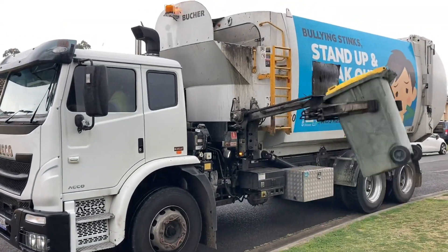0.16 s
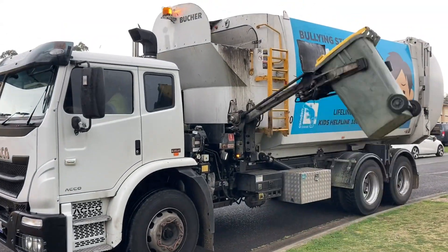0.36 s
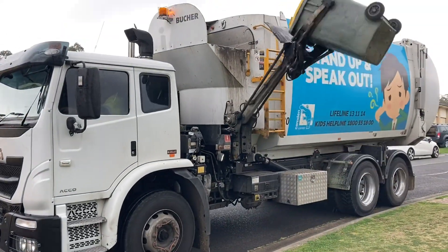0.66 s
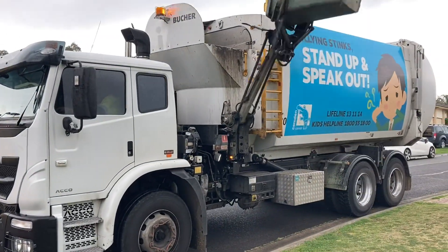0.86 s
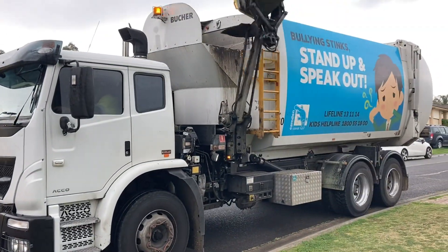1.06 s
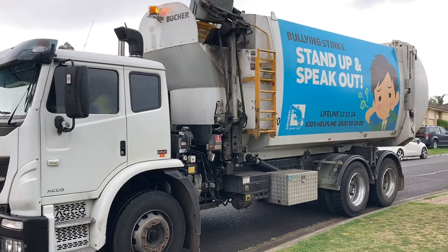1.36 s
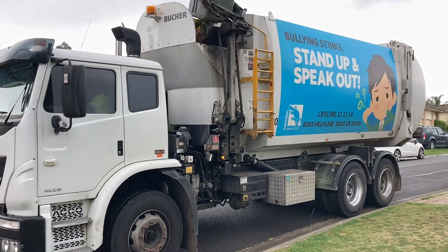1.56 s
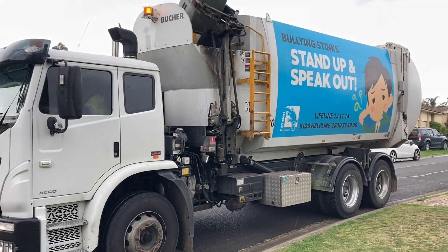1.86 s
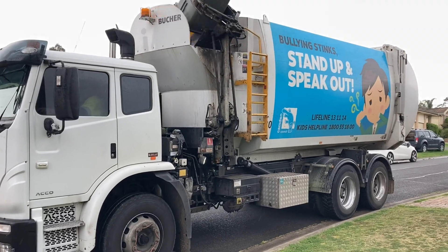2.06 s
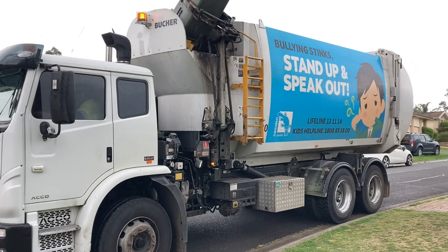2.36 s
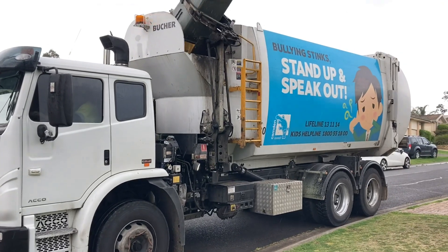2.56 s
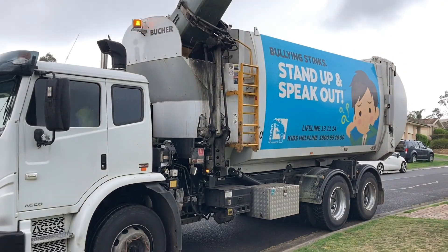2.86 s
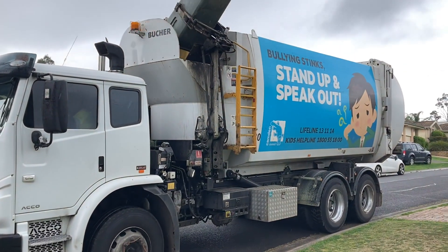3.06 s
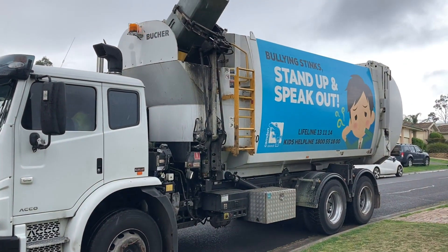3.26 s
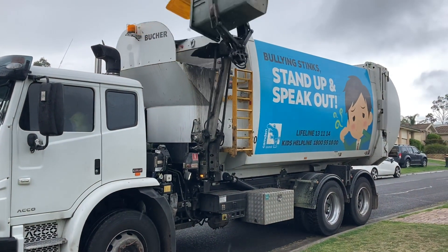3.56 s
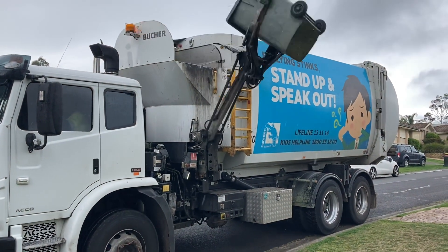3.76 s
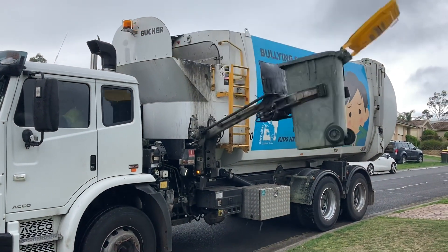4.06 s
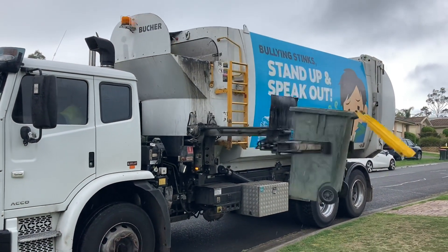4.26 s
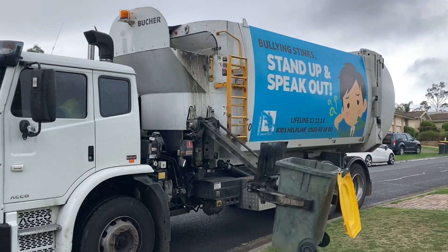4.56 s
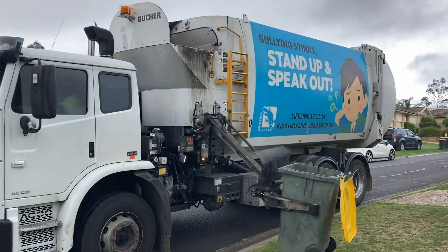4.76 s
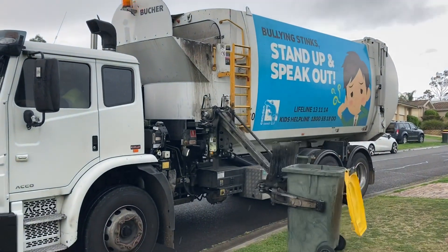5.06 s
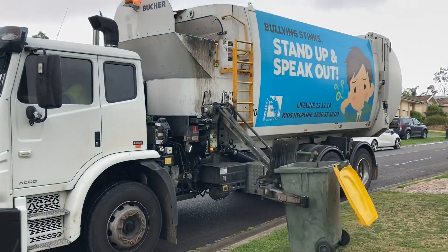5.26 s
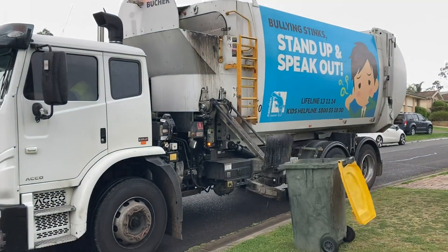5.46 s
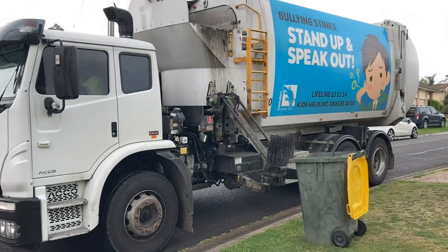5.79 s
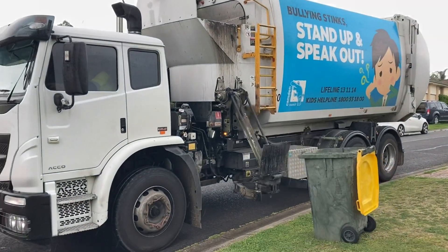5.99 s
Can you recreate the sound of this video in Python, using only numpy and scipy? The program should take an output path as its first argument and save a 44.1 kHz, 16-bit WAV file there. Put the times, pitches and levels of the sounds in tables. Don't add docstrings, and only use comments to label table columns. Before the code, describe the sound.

A handheld stereo phone hears a garbage truck close by on a suburban verge. Throbbing diesel knock and pump whine run throughout. Dull bumps lead to a dense, bright spill of rubbish with two huge metallic bangs and clinking glass and cans, fading in scattered clanks. Hydraulics hum more clearly while the arm descends, the bin bumps down, then air hisses with a small clack.

```python
import sys
import numpy as np
from scipy import signal
from scipy.fft import rfft, irfft, next_fast_len
from scipy.io import wavfile
from scipy.ndimage import uniform_filter1d

SR = 44100
rng = np.random.default_rng(int(sys.argv[2]) if len(sys.argv) > 2 else 0)


def undo_db(level):
    steps = np.asarray(level, float) / 20
    return 10 ** steps


def generate_wav(signal):
    frames = np.transpose(np.atleast_2d(signal))
    scaled = np.clip(frames, -1, 1) * 32767
    pcm = np.round(scaled).astype(np.int16)
    wavfile.write(sys.argv[1], SR, pcm)


N = 270333
M = 2 * next_fast_len(N // 2 + 1)
T, F = np.arange(N) / SR, np.arange(M // 2 + 1) * SR / M
PUMP_RATIO = 3.42


def curves(table):
    s, *columns = np.transpose(table)
    return [np.interp(T, s, c) for c in columns]


def unit(x):
    return x / np.sqrt(np.mean(x ** 2))


def colour(x, points, peaks=()):
    hz, db = np.transpose(points)
    gain_db = np.interp(np.log(F + 1), np.log(hz), db, left=-80, right=-80)
    for peak_hz, width_hz, peak_db in peaks:
        gain_db = gain_db + peak_db / (1 + (2 * (F - peak_hz) / width_hz) ** 2)
    return unit(irfft(rfft(x, M) * undo_db(gain_db), M)[..., :N])


def band(x, lo_hz, hi_hz):
    sos = signal.butter(2, [lo_hz, min(hi_hz, .45 * SR)], "band", fs=SR, output="sos")
    return unit(signal.sosfilt(sos, x))


def walk(rate):
    k = int(SR / rate)
    held = np.repeat(rng.standard_normal(N // k + 1), k)[:N]
    return unit(uniform_filter1d(uniform_filter1d(held, k), k))


def ring(x, hz, t60):
    r, w = np.exp(-np.log(1000) / (t60 * SR)), 2 * np.pi * hz / SR
    return signal.lfilter([np.sin(w)], [1, -2 * r * np.cos(w), r * r], x)


def tone(turns, db, wobble_db=1.5):
    level = np.sqrt(2) * undo_db(db + wobble_db * walk(6))
    return level * np.sin(2 * np.pi * (turns + rng.random()))


def noise(size=N):
    return rng.standard_normal((3, size))


def grains(size, rate, spread_db):
    size_db = spread_db * np.minimum(rng.exponential(size=size), 3)
    struck = rng.random(size) < rate / SR
    return unit(struck * undo_db(size_db) * noise(size))


def add(out, s, db, sound):
    i = int(s * SR)
    out[:, i:i + sound.shape[-1]] += undo_db(db) * (sound / np.abs(sound).max())[..., :N - i]


def engine():
    # t/s, firing rate f/Hz
    speed = [(0, 44.9), (.6, 46.15), (1, 46.5), (1.4, 47.15), (2.1, 47.2), (2.5, 46.7), (3.45, 45.95),
             (3.6, 47.5), (4.3, 47.1), (5.8, 47.2), (6.13, 46.85)]
    # t/s, level/dB, bass duck/dB
    engine_level = [(0, -31.5, 1.2), (.4, -28, 0), (.8, -28, -1.5), (1.0, -28, 0.1), (1.4, -29, 0.1),
                    (1.55, -30, -4), (1.74, -30, -4), (1.88, -39, -10.5), (2.2, -38, -7), (2.6, -39, -.2),
                    (3.1, -39, 2.2), (3.2, -36, .1), (3.45, -36.5, -3), (3.8, -38, 2.2), (4.6, -37, 3),
                    (5.0, -38, 1.2), (5.6, -35.5, 1.2), (6.13, -34.5, .1)]
    (hz,), (clatter_db, bass_duck_db) = curves(speed), curves(engine_level)
    turns = np.cumsum(hz) / SR
    first_db = clatter_db + 1.5 + 1.05 * bass_duck_db
    third_db = clatter_db + 5.0 + 0.95 * bass_duck_db
    rumble_db = clatter_db + 2.5 + 0.3 * bass_duck_db
    out = exhaust(turns, first_db, third_db)
    out = out + casing(turns, first_db, rumble_db, clatter_db)
    return out + hydraulics(turns, clatter_db, bass_duck_db) + arm_drones(turns, clatter_db)


def exhaust(turns, first_db, third_db):
    # multiple of firing rate, level over the third/dB
    orders = [(2, -17), (4, -13), (5, -15), (6, -9)]
    out = tone(1.01 * turns, first_db, 0.41) + tone(3 * turns, third_db)
    return out + sum(tone(k * turns, third_db + db, 2.0) for k, db in orders)


def casing(turns, first_db, rumble_db, clatter_db):
    cylinders = [0, -6, -12, -1, -7, -11]
    # f/Hz, level/dB
    shudder = [(25, -30), (40, -10), (75, 6), (115, -4), (140, 3), (200, -36)]
    # f/Hz, level/dB
    roar = [(90, -15), (150, -1), (220, -3), (300, -2), (360, -4), (420, -12), (480, -8), (540, -17),
            (800, -62)]
    # f/Hz, level/dB
    rattle = [(400, -25), (650, -5.5), (800, -8.5), (1300, -7), (1750, -9), (3000, -8.5), (5200, -15),
              (6800, -13), (9000, -14), (12000, -18), (15600, -24), (16200, -50)]
    # f/Hz, width/Hz, level/dB
    block = [(660, 27, 4), (1060, 250, 10), (1296, 33, 1.5), (1844, 17, -0.5), (2154, 116, 7),
             (2530, 34, 4.5), (3450, 320, 2.5), (4000, 130, 2.5), (4230, 120, 5), (6670, 100, 1.5)]
    firing = turns.astype(int)
    knock_db = np.array(cylinders)[firing % 6] + .8 * rng.standard_normal(400)[firing]
    throb = uniform_filter1d(undo_db(knock_db) * np.exp(-(turns % 1) / 1.3), 200)
    sub = colour(undo_db(1.9 * walk(4.94)) * noise(), shudder)
    rumble = colour((4.3 + throb) * undo_db(1.1 * walk(9)) * noise(), roar)
    clatter = colour((.95 + throb) * undo_db(.7 * walk(11)) * noise(), rattle, block)
    ticks = throb ** 2 * noise()
    clatter += undo_db(-17.5) * unit(ring(ticks, 3930, 0.047))
    clatter += undo_db(-22.0) * unit(ring(ticks, 2162, 0.099))
    return undo_db(first_db - 4.0) * sub + undo_db(rumble_db - 1.0) * rumble + undo_db(clatter_db + 3.5) * clatter


def hydraulics(turns, heard_db, bass_duck_db):
    # t/s, pulse level over the engine/dB
    pump = [(0, -17), (.8, .5), (1.7, -1.2), (1.9, -15), (2.1, -3), (2.3, 4), (2.6, 4), (3.0, -5),
            (3.2, -6), (3.5, 4), (3.8, .5), (4.2, 6.5), (5.0, 5), (5.4, 1.2), (6.13, 4.5)]
    pressure_db, = curves(pump)
    octave_db = heard_db - 8.0 - 0.8 * np.clip(pressure_db, -6.0, None) + bass_duck_db
    gear = 23.5 * turns + np.cumsum(9.0 * walk(12)) / SR
    pulses = tone(PUMP_RATIO * turns, heard_db + pressure_db)
    return pulses + tone(2 * PUMP_RATIO * turns, octave_db, 4.1) + tone(gear, heard_db - 6.5, 2.6)


def arm_drones(turns, heard_db):
    lowers_s, lowering_s = 3.5, 2.2
    lowered = np.clip((T - lowers_s) / lowering_s, 0, 1)
    lift = np.clip(1 - 10 * lowered, 0, 1) * tone(3 * PUMP_RATIO * turns, heard_db - 17.0, 2.1)
    fourth = tone(4 * PUMP_RATIO * turns, heard_db - 26.0 + 12.0 * lowered, 2.5)
    timing = tone(46 * turns, heard_db - 19.5, 3.0)
    return lift + fourth + timing


def thumps():
    # t/s, peak level/dB, f/Hz, ring t60/s
    dull_blows = [(.3, -22, 75, 0.13), (0.381, -12.5, 201, 0.18), (.67, -12, 55, .2), (1.02, -22, 90, .15),
                  (1.419, -15, 85, .2), (1.699, -14, 162, 0.12), (3.38, -24, 80, .35),
                  (3.52, -19, 74.8, .2), (3.55, -14, 150, 0.073), (4.464, -12, 130, 0.2),
                  (4.521, -18, 88.9, 0.18), (5.08, -19, 110, .08), (5.16, -14, 180, .08),
                  (5.18, -11, 98, .12), (5.2, -21, 300, .15), (5.215, -13, 95, .12)]
    out, t = np.zeros((3, N)), T[:SR // 6]
    for s, db, hz, t60 in dull_blows:
        push = np.sin(np.pi * np.clip(t * hz * 2.07, 0, 1))
        panel = ring(push, hz, t60) + 0.91 * ring(push, 1.3 * hz, 0.52 * t60)
        add(out, s, db, np.cos(3 * np.pi * t) * panel)
    return out


def hits():
    # t/s, peak level/dB, f/Hz, body level/dB, top level/dB
    sharp_blows = [(0.967, -16, 1100, -8, -15), (1.276, -22, 1130, -16, -14), (1.35, -11, 3840, -14, -22),
                   (1.652, -17, 1600, -17, -14), (1.7, 2.5, 1125, 2, -7), (1.782, 2.5, 1030, -7, -19),
                   (1.82, -2, 1156, 0, -12), (1.885, -6, 1050, -11, -16), (1.963, -19, 1290, -21, -24),
                   (1.994, -8.5, 2710, -17, -4), (2.028, -9.5, 1310, -1, -8), (2.079, -15, 1006, -22, -22),
                   (2.127, -14, 1070, -4, -12), (2.211, -17, 1300, -3, -25), (2.239, -14, 1028, -6, -14),
                   (2.298, -13, 1250, -8, -14), (2.359, -11, 1000, 1, -25), (2.402, -16, 1060, -13, -11),
                   (2.42, -9.5, 1100, -8, -16), (2.82, -21, 1500, -3, -14), (4.457, -12, 1100, -10, -16),
                   (5.881, -8.5, 1150, -9, -30), (5.895, -14, 1100, .5, -24), (5.928, -17, 1100, -3, -20)]
    out, t = np.zeros((3, N)), T[:SR // 6]
    for s, db, hz, body_db, top_db in sharp_blows:
        t60 = .13 * 2 ** (body_db / 16.0)
        plate_t60 = .6 * t60
        fall = np.exp(-np.log(1000) * t / t60) * np.clip(t / 0.00074, 0, 1)
        fall = fall * (1 + 0.93 * np.exp(-t / 0.0046))
        push = noise(len(t)) * np.exp(-t / 0.0072)
        modes = ring(push, hz, plate_t60) + .5 * ring(push, 1.43 * hz, plate_t60)
        middle = band(band(noise(len(t)), 470, 4400), 400, 5600)
        top = band(noise(len(t)), 5500, 14000)
        crack = undo_db(body_db) * middle + undo_db(top_db) * top
        add(out, s, db, modes / np.abs(modes).max() + 1.25 * fall * crack)
    return out


def surges(t):
    # t/s, level/dB, time to fall 20 dB/s, brightness/dB
    falls = [(1.335, -27, .1, 5), (1.372, -20, .12, 8), (1.40, -18.5, .17, -3.5), (1.45, -21, .1, 2.5),
             (1.495, -27, .1, 7), (1.52, -29, .11, 8), (1.595, -29, .06, -2.5), (1.635, -28, .07, -2.5),
             (1.672, -20, .05, -9), (1.70, -24, .15, 4.5), (1.735, -21, .12, .5), (1.78, -21, .12, 4),
             (1.81, -22, .14, 7), (1.885, -27, .07, 5), (1.955, -30, .09, -2.5), (2.0, -30, .3, 3.5),
             (2.105, -31, .16, 3), (2.195, -35, .1, 5), (2.225, -33, .12, 4), (2.29, -32, .12, 2.5),
             (2.345, -35, .12, 4), (2.40, -29, .12, 3), (2.495, -41, .2, 10), (2.615, -40, .05, .5)]
    layer_db = [6.0, 2.5, 1.2, -2.2]
    layer_tilt = [-0.9, -0.1, 0.8, 1.1]
    layer_haste = [0.9, 1.05, 0.95, 1.6]
    rise_s, power = .016, 0
    for s, db, fall_s, bright_db in falls:
        age = np.clip(t - s, 0, None)
        fallen_db = np.outer(layer_haste, -20 * np.clip(age - rise_s, 0, None) / fall_s)
        peak_db = db + np.array(layer_db) + bright_db * np.array(layer_tilt)
        power = power + (np.clip(age / rise_s, 0, 1) * undo_db(peak_db[:, None] + fallen_db)) ** 2
    return np.sqrt(power)


def rubbish():
    # f/Hz, ring t60/s, level/dB
    hopper = [(229, 0.17, -4), (288, 0.13, 0.5), (348, 0.071, -5), (419, 0.06, -4.5), (656, 0.039, 0),
              (1306, 0.036, -5), (1594, 0.032, -2.5), (1828, 0.049, 0.5), (2700, 0.097, -10),
              (3450, 0.026, 2), (4300, 0.044, -1)]
    tins_hz = [2005, 2200, 2470, 2700, 3100, 3450, 3880, 4310, 5500, 6640, 7100, 8700, 9300, 10200, 12500]
    out, span = np.zeros((3, N)), slice(SR, 3 * SR)
    scrape = (grains(2 * SR, 900, 3.2) + 0.94 * noise(2 * SR)) * undo_db(2.53 * walk(60)[span])
    plates = sum(undo_db(db) * unit(ring(scrape, hz, t60)) for hz, t60, db in hopper)
    tins = sum(unit(ring(grains(2 * SR, 70, 2.5), hz, 0.04)) for hz in tins_hz)
    load = unit(scrape + 0.19 * plates + 0.15 * tins)
    boom, body = band(load, 190, 887), band(load, 460, 2060)
    rattle = band(load + 0.22 * tins, 2200, 3960)
    hiss = band(load, 5300, 9800)
    gains = np.repeat(surges(T[span][::20]), 20, axis=1)
    out[:, span] = sum(gain * layer for gain, layer in zip(gains, [boom, body, rattle, hiss]))
    return out


def clinks():
    # t/s, f/Hz, peak level/dB
    tin_blows = [(1.35, 3880, -18), (1.355, 6520, -22), (1.38, 5500, -22), (1.38, 9300, -28),
                 (1.385, 3600, -26), (1.39, 11700, -29), (1.41, 2700, -13), (1.44, 2640, -14.5),
                 (1.45, 5730, -20), (1.465, 9200, -26), (1.515, 3400, -13), (1.525, 2760, -15),
                 (1.53, 9300, -14), (1.565, 2200, -24.5), (1.57, 3450, -22), (1.715, 3450, -18),
                 (1.735, 9300, -20), (1.995, 3400, -24), (2.065, 2770, -23), (2.29, 3200, -22),
                 (2.41, 3520, -26), (2.505, 11920, -36), (2.53, 8700, -22), (2.51, 2200, -35),
                 (5.64, 10800, -26)]
    out, t = np.zeros((3, N)), T[:SR // 6]
    for s, hz, db in tin_blows:
        add(out, s, db, ring(noise(len(t)) * np.exp(-t / 0.022), hz, .085))
    return out


def hopper_sides():
    # t/s, peak level/dB, f/Hz, ring t60/s
    panels = [
        (1.45, -15, 215, .7),
        (1.46, -18, 262, .6),
        (1.70, -22, 237, .5),
        (2.42, -25, 340, 1.2),
        (2.45, -35, 425, .6),
        (2.49, -29, 262, 1.2),
    ]
    out = np.zeros((3, N))
    for s, db, hz, t60 in panels:
        add(out, s, db, ring(np.exp(-T[:SR] * hz * 3), hz, t60))
    return out


def air_valve():
    # f/Hz, level/dB
    air_colour = [(1500, -25), (4000, -5), (7000, -4), (11000, 2.5), (15600, -2), (16200, -30)]
    opens_s, rise_s, hold_s = 5.62, .04, .13
    age = T - opens_s
    after = np.clip(age - rise_s - hold_s, 0, None)
    db = -27.5 - 3.0 * np.clip(after / rise_s, 0, 1) - 32.0 * after
    opening = np.clip(age / rise_s, 0, 1) ** 2
    return opening * undo_db(db + 0.81 * walk(29.4)) * colour(noise(), air_colour)


def ports(paths):
    # f/Hz, right phase/rad, left minus right level/dB, shared share/0-1
    port_table = [(0, 0, 1.5, 0.95), (150, 0.14, -1, 1), (302, 0.02, -3, 0.96), (430, 0, -11.5, 0.84),
                  (519, -2.2, 1, 0.97), (863, -1.64, 7.5, 0.37), (1100, 0.5, 4.5, 1),
                  (1600, -2.47, 8, 0.53), (2150, -2.5, 5.5, 0.32), (2540, -2, 5, 0.74),
                  (3400, -2.5, 2, 0.91), (4210, -2.4, 3.5, 0), (4350, -0.5, 2.5, 0), (5420, -2.5, 0.5, 1),
                  (6000, -1, 0, .5), (6833, 0, 0.5, 0.83)]
    hz, phase, pan_db, share = np.transpose(port_table)
    lag, high = phase[-1] + 2 * np.pi * (F - hz[-1]) / 4510, F > hz[-1]
    steered = lag - .4 * np.sin(2 * lag)
    shift = np.exp(1j * np.where(high, steered, np.interp(F, hz, phase)))
    loosened = 1 - .3 * np.sin(lag) ** 4
    share = np.where(high, loosened, np.clip(np.interp(F, hz, share), 0, 1))
    pan_db = np.interp(F, hz, pan_db)
    both, *own = rfft(paths, M)
    heard = np.sqrt(share) * np.array([both, both * shift]) + np.sqrt(1 - share) * np.array(own)
    return irfft(heard * undo_db(np.array([pan_db, -pan_db]) / 2), M)[:, :N]


def scene():
    bin_blows = thumps() + hits()
    load = rubbish() + clinks() + hopper_sides()
    return ports(engine() + bin_blows + load + air_valve())


def band_limit(x):
    return signal.sosfilt(signal.butter(12, 17110, fs=SR, output="sos"), x)


def record(dry):
    bass = signal.butter(3, 36, "high", fs=SR, output="sos")
    top = signal.ellip(8, .2, 45, 15850, fs=SR, output="sos")
    rounded = np.tanh(1.097 * signal.sosfilt(bass, dry)) / 1.102
    return band_limit(signal.sosfilt(top, rounded))


dry = scene()
out = record(dry)
generate_wav(out)
```